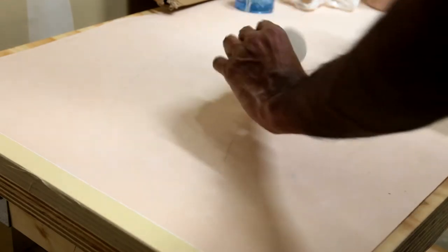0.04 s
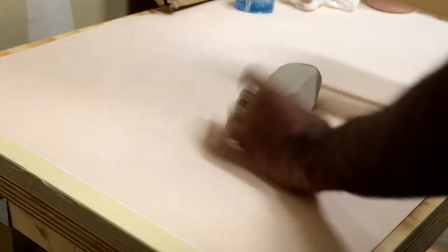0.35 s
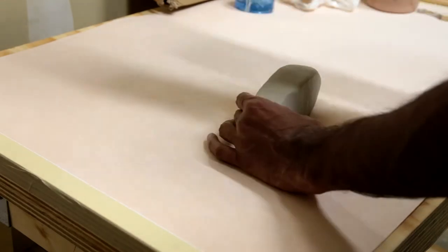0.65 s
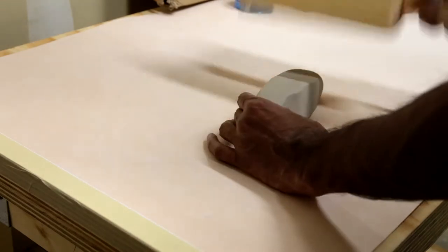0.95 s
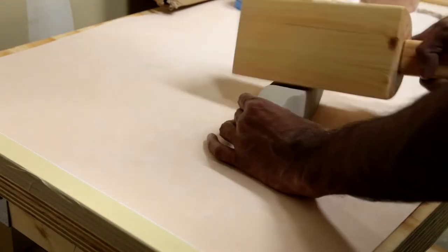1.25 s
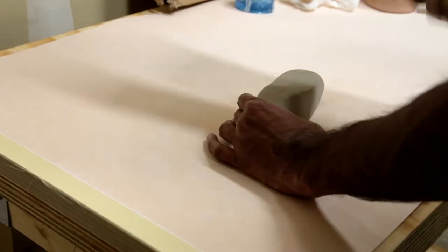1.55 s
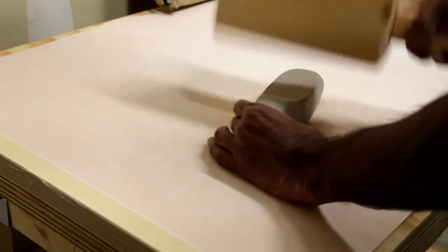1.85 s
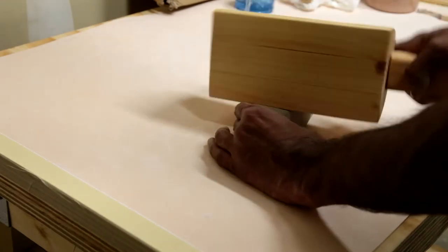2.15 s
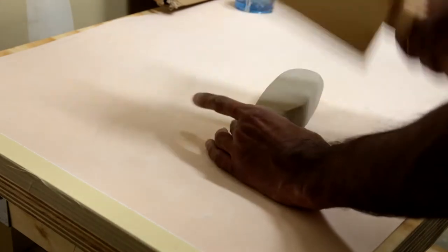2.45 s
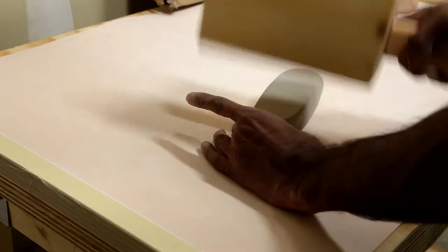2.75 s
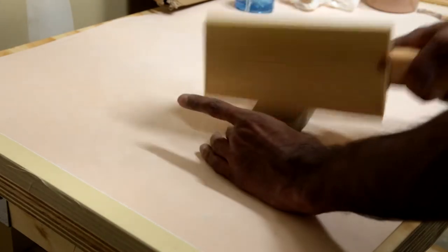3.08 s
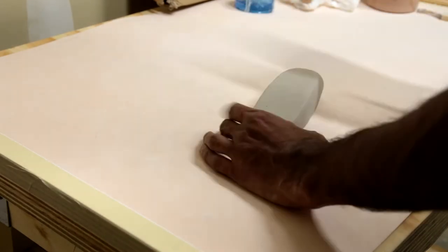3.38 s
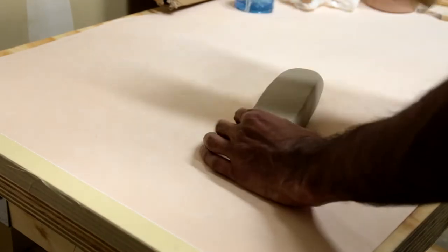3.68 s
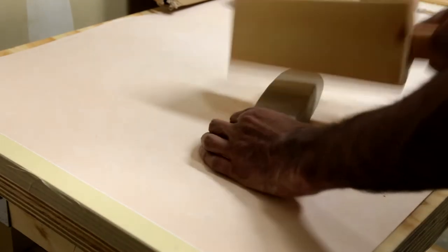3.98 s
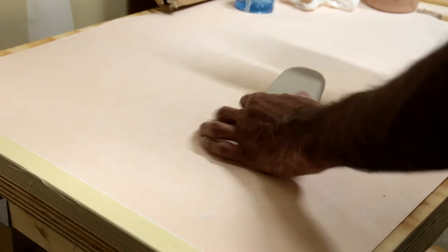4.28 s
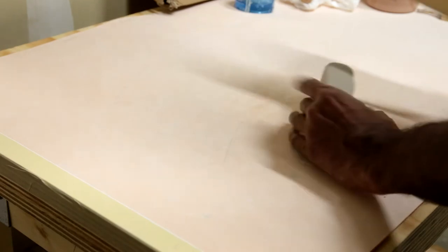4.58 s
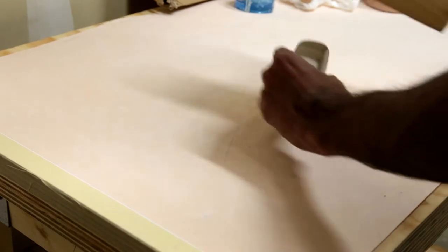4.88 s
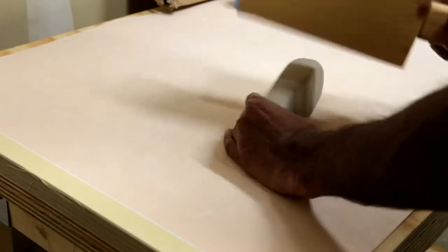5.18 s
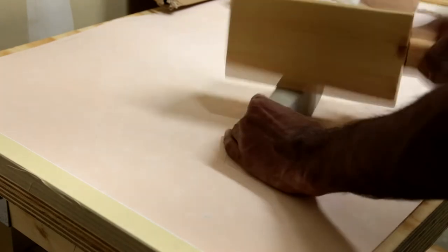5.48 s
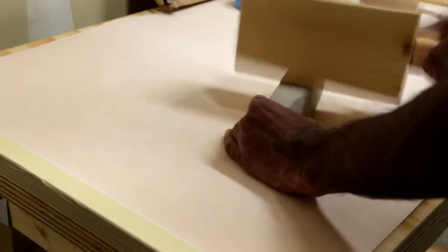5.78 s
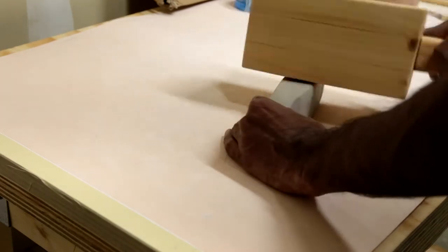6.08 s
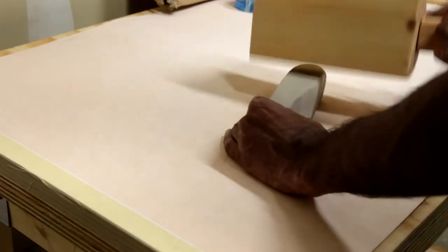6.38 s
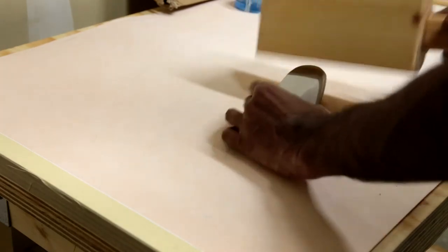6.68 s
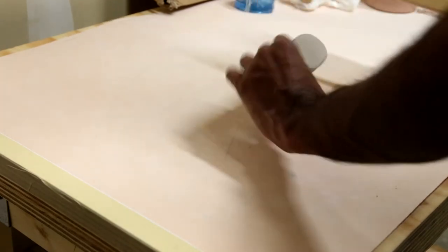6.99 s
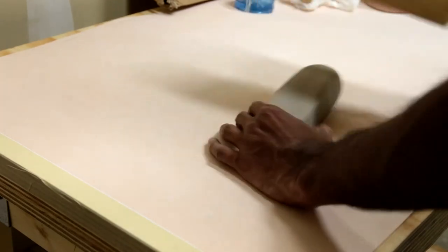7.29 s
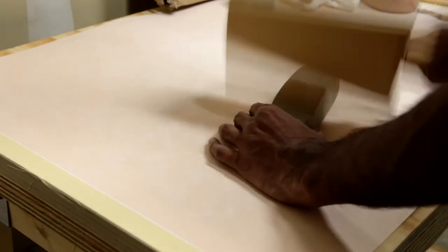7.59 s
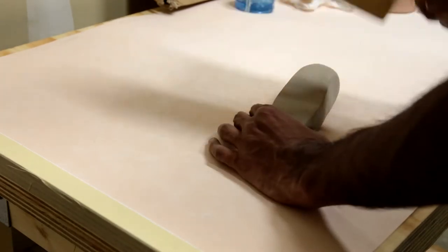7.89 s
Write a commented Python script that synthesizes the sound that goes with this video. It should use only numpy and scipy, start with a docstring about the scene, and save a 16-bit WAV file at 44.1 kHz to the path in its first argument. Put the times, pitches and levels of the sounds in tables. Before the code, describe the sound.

A wooden mallet pounds damp clay on a big wooden table, heard close in an echoing workshop over a faint rush of air. At 0.2 seconds the clay is set down with a light tap. From 0.8 to 3 seconds six blows land, a little under half a second apart, each with a low, briefly ringing table thump. The first three have a bright, wet slap; the later ones are duller. A single heavy thud follows at 3.9 seconds. A hand softly rubs and turns the clay, setting it down with a sticky tap at 5.1. Five quicker blows run from 5.6 to 6.7 seconds, the first light, the rest firmer and more knocking. Around 7.2 the clay is set down again with a soft bump and a short slide. One last strong blow lands at 7.7 seconds and echoes away.

```python
"""A wooden mallet pounds a lump of clay on a big wooden table in an echoing workshop.
Each blow slaps the damp clay, rings the mallet head and, once the clay has given way, thumps the table.
In the pauses a hand turns the clay and sets it down. The room echoes over a faint rush of air,
and a limiter briefly turns down the hardest blows."""
import sys
import numpy as np
from scipy import signal
from scipy.fft import rfft, irfft, next_fast_len
from scipy.io import wavfile
from scipy.ndimage import uniform_filter1d

SR = 44100
rng = np.random.default_rng(int(sys.argv[2]) if len(sys.argv) > 2 else 0)


def store_wav(level_fs):
    """Save 16-bit WAV to argv[1]."""
    pcm = np.round(np.clip(np.atleast_2d(level_fs), -1, 1) * 32767)
    wavfile.write(sys.argv[1], SR, pcm.T.astype(np.int16))


N = 354551

# mallet blows: (time [s], force [dB], knock of a tilted face [dB], slap of a flat face [dB],
# head ring [dB], air snap [dB], snap pitch [Hz], slap's upper edge [Hz])
BLOWS = [(.8463, -11, -13, -12.5, -12, -22.5, 4700, 14000),
         (1.2925, -4.5, -16, -14.5, -14, -19.5, 4450, 14000), (1.7089, -6, -20, -15, -7, -25, 4370, 14000),
         (2.1406, -9.5, -24.5, -19.5, -19, -31, 8000, 10300),
         (2.577, -5.5, -22.5, -28, -22.5, -32, 5200, 9100),
         (3.0414, -6, -12.5, -28.5, -31.5, -34, 4600, 11700),
         (3.9137, -3.5, -25, -25, -27.5, -34, 5200, 14000),
         (5.5501, -17.5, -32, -27.5, -30.5, -30.5, 4300, 11900),
         (5.8522, -10, -27.5, -32, -30.5, -39, 4700, 12300),
         (6.129, -5.5, -15.5, -33, -30, -39, 4100, 13000),
         (6.384, -11, -11.7, -37.5, -29.5, -60, 4200, 12500),
         (6.6671, -6, -13, -29, -21, -43.5, 4350, 15000), (7.6671, -5, -23, -20, -21, -26.5, 5750, 12600)]
# the lump is set down edge first, then tips onto its face:
# (time [s], time to tip [s], tap [dB], sticky click [dB], thump [dB])
SET_DOWNS = [(.1887, .0063, -29, -33.5, -28), (5.068, .0122, -28.5, -26, -20),
             (7.135, .008, -27.5, -23, -33.5)]
# the hand comes to rest on the table: (time [s], thump [dB], click of the skin [dB])
HAND_RESTS = [(.275, -34.5, -47), (7.193, -25, -38), (7.457, -37.5, -59)]
# tone of the table's boards: (frequency [Hz], level [dB])
BOARD_TONE = [(30, -30), (60, -15), (170, 2.5), (240, -0.5), (330, 0.5), (420, -9), (580, -0.5),
              (800, -8.5), (1000, -9), (1400, -10.5), (2000, -11.5), (3200, -25), (6000, -44.5),
              (16000, -73.5)]

USUAL_FORCE_DB, USUAL_KNOCK_DB, USUAL_SLAP_DB = -8, -20, -25  # a typical blow
THUMP_LEAD_S = .02  # from the first bending of the table top to its peak


def amp(db):
    """Turn decibels into a gain to multiply by."""
    return 10 ** (np.asarray(db) / 20)


def unit(x):
    """Scale x to an average strength (rms) of 1."""
    return x / np.sqrt(np.mean(x ** 2) + 1e-20)


def along(points, hz):
    """Read between (frequency, value) points, spacing the octaves evenly."""
    frequencies, values = np.transpose(points)
    return np.interp(np.log(hz + 1), np.log(frequencies), values)


def add(track, s, sound):
    """Mix a sound into the track, starting at s seconds."""
    part = track[max(round(s * SR), 0):][:len(sound)]
    part += sound[:len(part)]


def noise(tone, size):
    """Steady noise with the given tone and a strength of 1."""
    m = next_fast_len(size)
    gain = amp(along(tone, np.fft.rfftfreq(m, 1 / SR)))
    return unit(irfft(rfft(rng.standard_normal(m)) * gain, m)[:size])


def colour(tone, db=0, shift=1, size=8192):
    """A gain for each frequency: the tone at level db, its pitch multiplied by shift."""
    gain = amp(along(tone, np.fft.rfftfreq(size, 1 / SR) / shift))
    return amp(db) * unit(gain)


def burst(gain, t60, size=8192):
    """A rough contact: noise shaped by gain that fades by 60 dB in t60 seconds."""
    fade = np.exp(-np.log(1000) * np.arange(size) / SR / t60)
    force = rfft(rng.standard_normal(size) * fade)
    ripple = np.sqrt(np.abs(uniform_filter1d(np.abs(force) ** 2, size=21)) + 1e-9)
    # even out chance peaks and apply the tone, with no sound ahead of the hit
    cepstrum = irfft(np.log(gain / ripple + 1e-12))
    cepstrum[1:size // 2] *= 2
    cepstrum[size // 2 + 1:] = 0
    return irfft(force * np.exp(rfft(cepstrum))) * np.sqrt(SR / 100)  # level counted over 10 ms


def room_air():
    """The faint, steady rush of the room's air."""
    # tone of the air: (frequency [Hz], level [dB])
    air_tone = [(15, -43.5), (25, -27), (38, -14.5), (76, -5.5), (130, -3.5), (170, -11.5), (205, -4.5),
                (222, -7.5), (425, -15.5), (1060, -19.5), (3220, -25), (5980, -35.5), (10500, -32.5),
                (15800, -35.5)]
    return amp(-55.5) * noise(air_tone, N)


def room_tail(build_s):
    """A wash of echoes that swells briefly; each frequency dies at its own speed."""
    # how long the room rings: (frequency [Hz], time to fade by 60 dB [s])
    fade_times = [(100, 0.55), (400, 0.81), (1100, 0.8638), (2800, 0.72), (5000, 0.76), (8000, 0.5539),
                  (12000, 0.41), (16000, 0.4)]
    # tone of the echoes: (frequency [Hz], level [dB])
    echo_tone = [(60, -5), (250, 1.5), (1200, -2.5), (3000, -3), (6000, -3.5), (12000, -6), (16000, -6)]
    hz, t, bands = signal.stft(rng.standard_normal(SR), SR, nperseg=256)
    gain = amp(along(echo_tone, hz)[:, None] - 60 * t / along(fade_times, hz)[:, None])
    tail = signal.istft(bands * gain, SR, nperseg=256)[1][:SR]
    swell = 1 - np.exp(-np.arange(SR) / SR / build_s)
    return tail * swell / np.sqrt(SR / 20)


def workshop_echo(x):
    """The room's echo: part stays the same, part changes as arm and mallet move between blows."""
    out = np.zeros(N)
    still, still_share = room_tail(build_s=.017), .3
    edges = [0] + [round(s * SR) for s, *_ in BLOWS] + [N]
    for start, end in zip(edges, edges[1:]):
        tail = np.sqrt(still_share) * still + np.sqrt(1 - still_share) * room_tail(build_s=.016)
        add(out, start / SR, signal.fftconvolve(x[start:end], tail))
    return out


def touch(gain, t60=.012):
    """A light contact of damp clay, with a short sticky crackle after it."""
    return burst(gain, t60) + amp(-12) * burst(gain, t60=.04)


def hand():
    """A hand slides the clay round and sets it down with a tap and a small sticky click."""
    # the lump rocks and taps the table: (time [s], level [dB])
    taps = [(4.548, -38), (4.556, -40), (4.627, -44), (6.1264, -25), (6.380, -33)]
    # fingers come unstuck from the clay: (time [s], level [dB])
    unsticks = [(.435, -47), (.446, -44), (4.505, -47)]
    # skin and clay slide on the table cover: (middle time [s], half length [s], level [dB])
    rubs = [(.436, .015, -48), (3.295, .12, -52), (3.601, .16, -59.5), (4.256, 0.13, -51.5),
            (4.377, .07, -53), (4.517, 0.035, -39.5), (4.56, 0.028, -49), (5.187, .09, -47),
            (6.878, 0.067, -50.5), (7.297, 0.049, -40)]
    # tones of a tap, a sticky click and a rub: (frequency [Hz], level [dB])
    tap_tone = [(100, -23.5), (600, -4), (1000, -2), (1350, 5), (1850, 4.5), (2400, -7.5), (4500, -20.5),
                (16000, -45)]
    click_tone = [(200, -2), (900, -4), (1500, 0), (2600, 5), (5000, -9), (7000, -11.5), (9500, -3),
                  (13000, -15), (16000, -26)]
    rub_tone = [(200, 3), (1000, 1), (2000, 9), (5500, -3.5), (9500, 0), (12500, -2), (16000, -17)]
    out = np.zeros(N)
    for s, tip_s, tap_db, click_db, thump_db in SET_DOWNS:
        add(out, s, touch(colour(tap_tone, tap_db), t60=.014))  # the edge lands first
        face = np.hypot(colour(tap_tone, tap_db - 2), colour(click_tone, click_db))
        add(out, s + tip_s, touch(face, t60=.022))
        add(out, s + tip_s, burst(colour(BOARD_TONE, thump_db - 12), t60=.12))
    for s, db in taps:
        add(out, s, touch(colour(tap_tone, db)))
    skin_clicks = [(s, db) for s, _, db in HAND_RESTS]
    for s, db in unsticks + skin_clicks:
        add(out, s, touch(colour(click_tone, db)))
    for s, half_s, db in rubs:
        stroke = np.hanning(int(2 * half_s * SR)) ** 2
        add(out, s - half_s, amp(db) * stroke * noise(rub_tone, len(stroke)))
    return out


def table_flex(pitch_hz):
    """The table top dips and springs back in a few low swings."""
    t = np.arange(SR // 10) / SR - THUMP_LEAD_S
    width_s = .68 / pitch_hz
    return np.cos(2 * np.pi * pitch_hz * t) * np.exp(-((t - .001) / width_s) ** 2 / 2)


def table_ring(build_s):
    """The table's notes swell as the bend spreads; higher ones vary more with the spot that is hit."""
    # the table top's own notes: (frequency [Hz], level [dB], time to fade by 60 dB [s])
    table_notes = [(62, -30, 0.7), (78, -25, .8), (96, -23, 0.87), (114, -21.5, .55), (124, -21, 0.8),
                   (150, -27.5, 0.46), (154.8, -8.3, 0.62), (165, -18.5, 0.28), (207, -25, 0.6),
                   (218, -18.5, .6), (248, -20, 0.78), (273.7, -30, .55), (305, -29.5, 0.98),
                   (324.5, -14.5, 0.41), (344.5, -23.5, 0.69), (414, -33.5, 0.4), (459, -30, .6),
                   (511, -25.5, 0.75), (533, -28, .6), (624, -33.5, 0.97), (690, -26.5, .6),
                   (836, -36, 0.6), (990, -34, 0.85)]
    t = np.arange(SR) / SR
    hz, db, t60 = np.transpose(table_notes)[:, :, None]
    strength = amp(db + 2 * np.sqrt(hz / hz.max()) * rng.standard_normal(db.shape))
    notes = strength * np.cos(2 * np.pi * hz * t) * amp(-60 * t / t60)
    return notes.sum(0) * (1 - np.exp(-t / build_s))


def thump(db):
    """One push on the table. A gentle push is slower and rings the top less."""
    sound = np.zeros(SR)
    softness = np.clip(-db, 0, 18)
    add(sound, 0, table_flex(pitch_hz=128 - 1.1 * softness))
    add(sound, THUMP_LEAD_S, amp(-.22 * softness) * table_ring(build_s=.0081))
    return amp(db) * sound


def squash_time(force_db, slap_db):
    """Seconds the clay takes to squash: fewer under more force, more when a flat face cushions it."""
    return .0182 - .00044 * (force_db - USUAL_FORCE_DB) + .00014 * (slap_db - USUAL_SLAP_DB)


def table_thumps():
    """Blows, the landing lump and the resting hand push the table once clay or hand has squashed."""
    out = np.zeros(N)
    touch_lag_s = .017
    for s, force_db, _, slap_db, *_ in BLOWS:
        add(out, s + squash_time(force_db, slap_db) - THUMP_LEAD_S, thump(force_db))
    landings = [(s + tip_s, db) for s, tip_s, _, _, db in SET_DOWNS]
    for s, db, *_ in landings + HAND_RESTS:
        add(out, s + touch_lag_s - THUMP_LEAD_S, thump(db))
    return out


def rolled_off(tone, top_hz):
    """A softer contact keeps less treble above top_hz."""
    return [(hz, db - 10 * np.log10(1 + (hz / top_hz) ** 10)) for hz, db in tone]


def mallet():
    """Wood hits clay: returns the sound at the point of contact and the sound of the wide boards."""
    # a flat face smacks the damp clay: (frequency [Hz], level [dB])
    slap_tone = [(300, -24), (1500, -7.5), (3000, -0.5), (4200, -0.5), (6000, -6), (8300, .5), (11000, 1),
                 (13000, -1.5), (16000, -12)]
    # a tilted face knocks: (frequency [Hz], level [dB])
    knock_tone = [(60, -31), (250, 4.5), (520, 2.5), (780, -2), (1000, 3.5), (1400, -3.5), (2000, -7.5),
                  (3000, -13), (5000, -28), (16000, -93)]
    # air is squeezed from the gap, pitched by the clay's shape: (frequency [Hz], level [dB])
    snap_tone = [(500, -30.5), (3200, -18), (4000, 0), (4400, 1), (4850, -8), (5800, -20.5), (16000, -36)]
    # tone of the wooden head: (frequency [Hz], level [dB])
    head_tone = [(200, -26.5), (1000, -14), (1500, -8), (2000, -7.5), (2400, 3), (2950, 4.5), (3400, -11.5),
                 (3900, -18.5), (4450, -16), (5400, -20), (16000, -36.5)]
    # the head's own notes: (frequency [Hz], level [dB], time to fade by 60 dB [s])
    head_notes = [(2410, -13.5, .045), (2650, -16, .04), (2960, -13.5, .05)]
    snap_tone_hz, head_tone_hz = 4400, 2750  # pitches of these two tones before shifting
    contact, boards = np.zeros((2, N))
    t = np.arange(SR // 8) / SR
    for s, force_db, knock_db, slap_db, head_db, snap_db, snap_hz, top_hz in BLOWS:
        # a flat contact loads the head and lowers its pitch
        head_hz = 2820 - 12 * (slap_db - USUAL_SLAP_DB)
        head = colour(head_tone, head_db, shift=head_hz / head_tone_hz)
        slap = colour(rolled_off(slap_tone, top_hz), slap_db)
        snap = colour(snap_tone, snap_db, shift=snap_hz / snap_tone_hz)
        smack = np.sqrt(slap ** 2 + snap ** 2 + head ** 2)
        add(contact, s, burst(smack, t60=.01))
        add(contact, s + .002, amp(-9) * burst(smack, t60=.046))  # the clay crackles as it spreads
        for hz, db, t60 in head_notes:  # the clay soon stops their ringing
            note_db = head_db + db + rng.normal(0, 1.5)
            add(contact, s, amp(note_db - 60 * t / t60) * np.sin(2 * np.pi * hz * t))
        add(contact, s + .001, burst(colour(knock_tone, knock_db), t60=.065))
        # the force passes through the clay and spreads over the boards
        board_db = -25 + .58 * (force_db - USUAL_FORCE_DB) + .24 * (knock_db - USUAL_KNOCK_DB)
        board_s = s + .8 * squash_time(force_db, slap_db)
        add(boards, board_s, burst(colour(BOARD_TONE, board_db), t60=.08))
    return contact, boards


def scene():
    """Mix mallet, hand and table with the room's air and echoes."""
    # echoes from the nearest walls: (delay [s], level [dB])
    near_walls = [(.0092, -11), (0.0161, -16.5)]
    contact, boards = mallet()
    handling, thumps = hand(), table_thumps()
    near = contact + handling
    out = near + amp(1.2) * boards + thumps + room_air()
    for delay_s, db in near_walls:
        add(out, delay_s, amp(db) * near)
    # the boards send most of their sound away from the listener, into the room
    into_room = amp(-1) * contact + amp(-.5) * handling + amp(11.7) * boards + amp(-15.5) * thumps
    return (out + workshop_echo(into_room))[None]


def limiter(x, threshold_db, attack_s, release_s):
    """Peaks over the threshold quickly pull the volume down; it then creeps back up."""
    t = np.arange(N) / SR
    level_db = 10 * np.log10(2 * np.abs(uniform_filter1d(x ** 2, size=40)) + 1e-12)
    over_db = np.maximum(level_db - threshold_db, 1e-6)
    # hold each peak and let it fade
    held_db = np.exp(np.maximum.accumulate(np.log(over_db) + t / release_s) - t / release_s)
    smoothing = np.exp(-1 / (attack_s * SR))
    cut_db = signal.lfilter([1 - smoothing], [1, -smoothing], held_db)
    return x * amp(-cut_db)


def record(dry):
    """Turn down the hardest blows, round off the peaks and cut the highest treble."""
    limited = limiter(dry[0], threshold_db=-2.5, attack_s=.001, release_s=.06)
    rounded = limited / (1 + np.abs(limited) ** 8) ** (1 / 8)
    m = next_fast_len(N + SR // 2)
    kept_band = np.fft.rfftfreq(m, 1 / SR) < 15950  # Hz
    return irfft(rfft(rounded, m) * kept_band, m)[None, :N]


dry = scene()
out = record(dry)
store_wav(out)
```